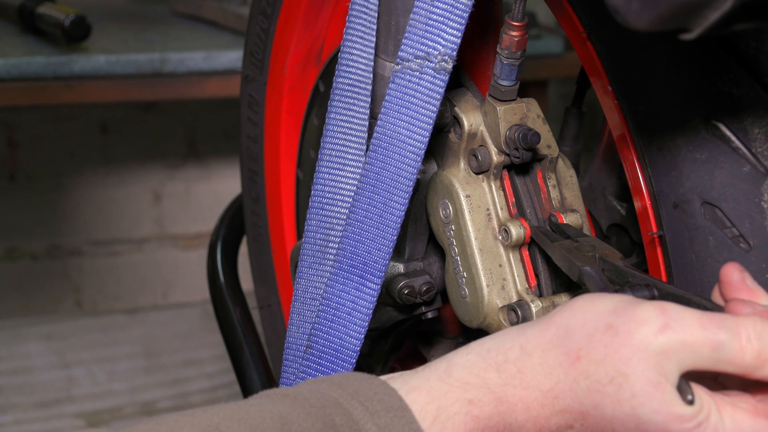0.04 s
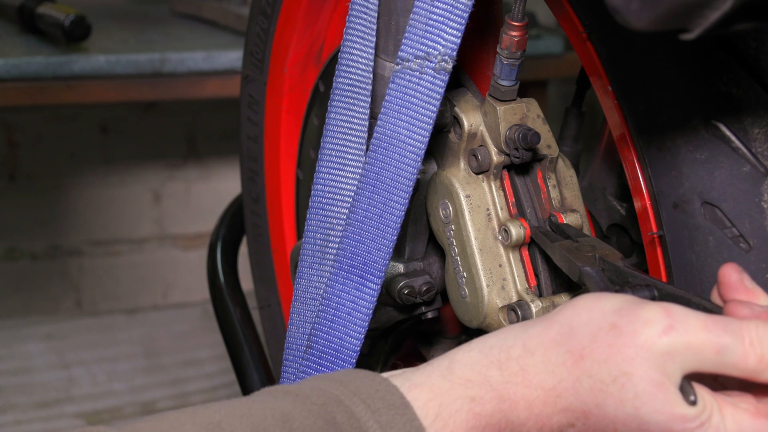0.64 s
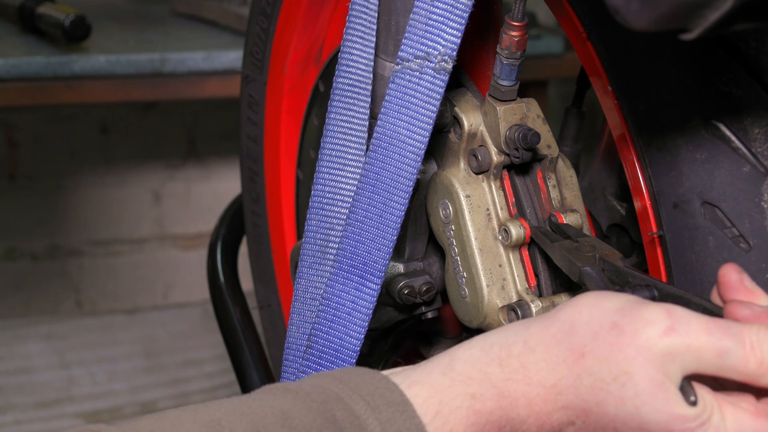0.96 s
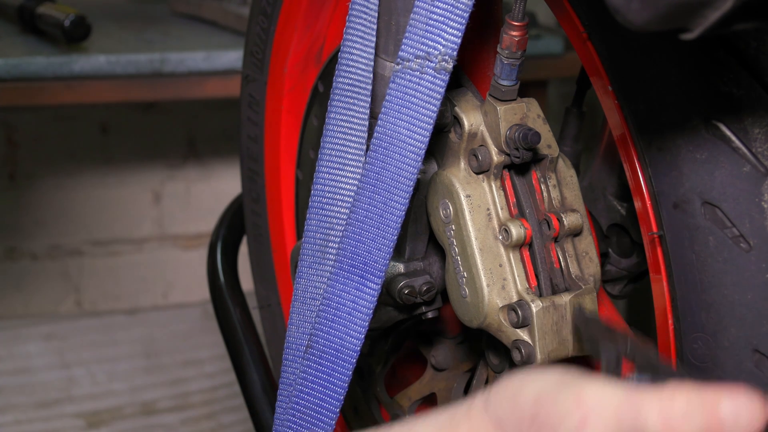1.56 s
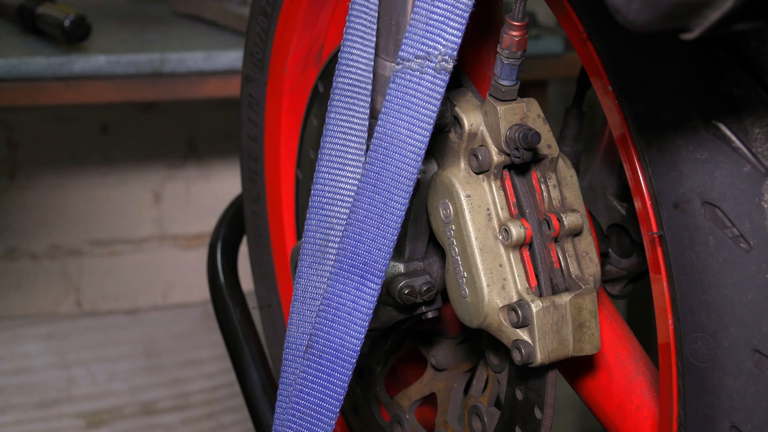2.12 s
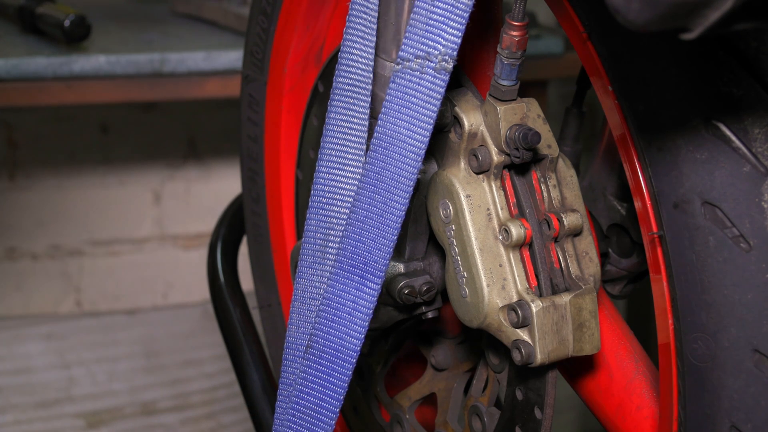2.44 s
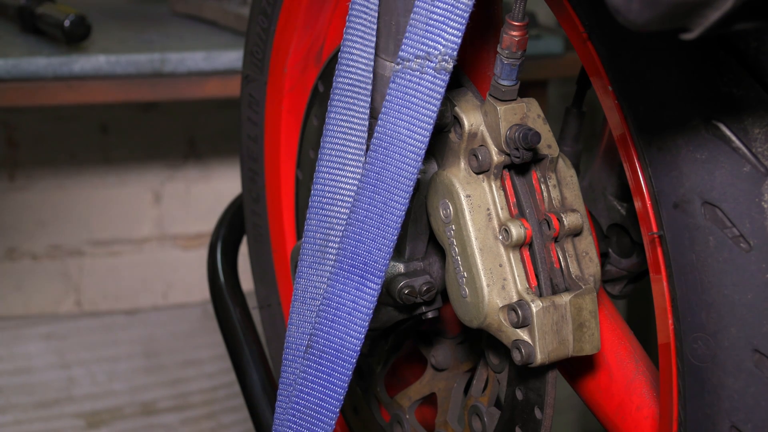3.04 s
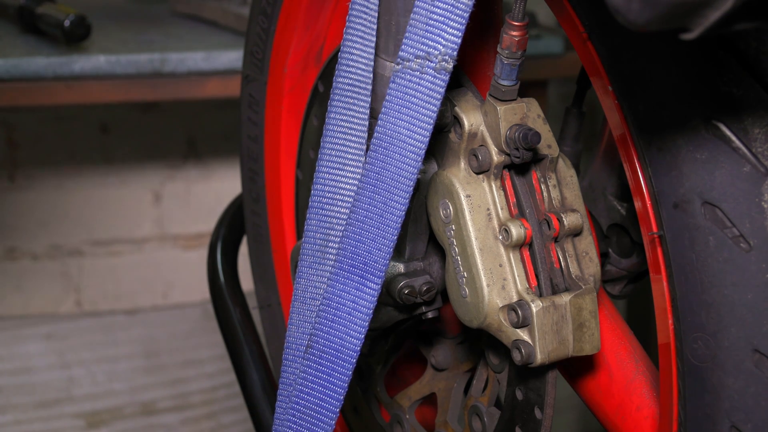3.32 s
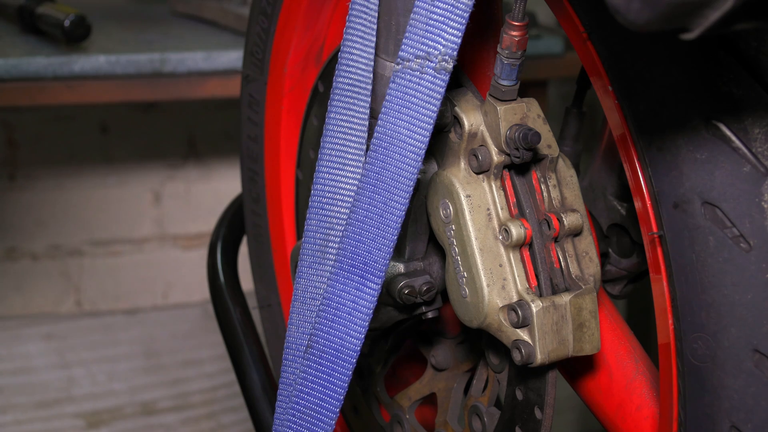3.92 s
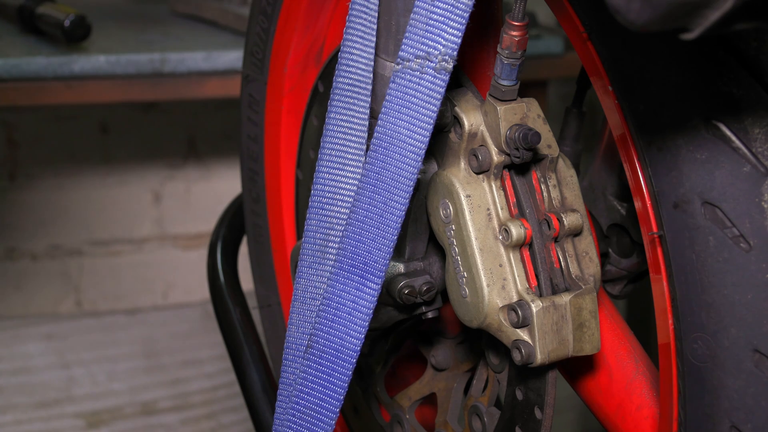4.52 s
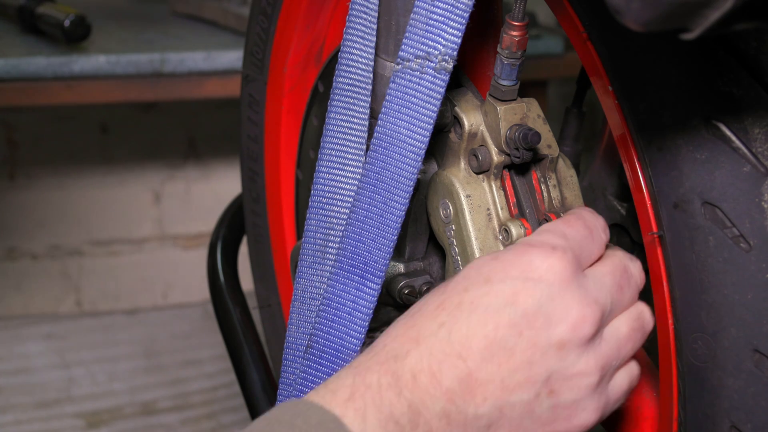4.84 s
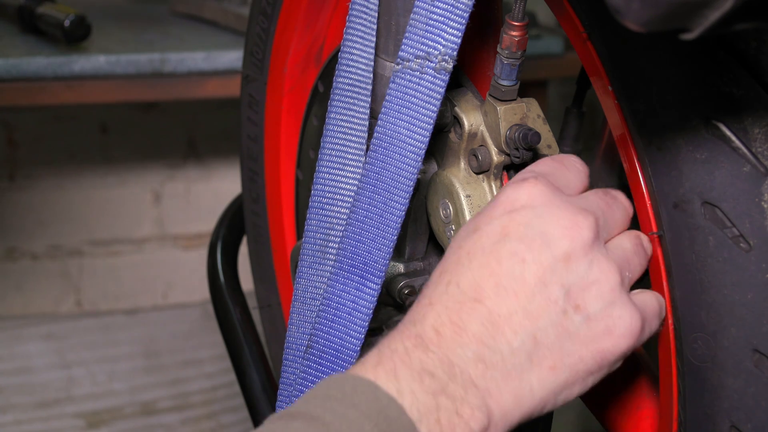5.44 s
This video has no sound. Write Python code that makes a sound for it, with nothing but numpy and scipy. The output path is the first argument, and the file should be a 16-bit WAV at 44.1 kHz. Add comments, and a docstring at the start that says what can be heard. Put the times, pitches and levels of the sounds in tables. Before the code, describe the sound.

In a quiet small garage with a faint low hum, pliers slip and grate against a brake caliper close to the microphone, ending in a loud, hard metallic snap. After light ticks and a soft brush of cloth, the tool is put down with a quick run of clanks. Near the end come faint metal clicks and a short gritty slide as the brake pads are shifted.

```python
"""Pliers out of a brake caliper

Steel pliers scrape out from between the pads of a motorcycle brake caliper and knock against it as
they come free. They clatter down on the work platform, then fingers shift the loose pads. Each hit
is a dense noisy ring plus a few clear modes. A sleeve rustles now and then, and the small brick
garage rings briefly over a faint low hum."""
import sys
import numpy as np
from scipy import signal
from scipy.fft import rfft, irfft, next_fast_len
from scipy.io import wavfile

SR = 44100
rng = np.random.default_rng(int(sys.argv[2]) if len(sys.argv) > 2 else 0)


def wrap_up_sound(samples):
    """Save the sound to the file named by the first command line argument, as 16-bit audio."""
    columns = np.atleast_2d(samples).T
    # keep every value between -1 and 1, then stretch to whole-number steps
    tamed = np.clip(columns, -1, 1)
    steps = np.round(tamed * 32767).astype(np.int16)
    wavfile.write(sys.argv[1], SR, steps)


N = 246028
TIME = np.arange(N) / SR
RING_TIME = np.arange(int(.6 * SR)) / SR
THIRDS = 25 * 2 ** (np.arange(29) / 3)   # third-octave band centres in Hz

# The low hum. Each row: time in seconds, pitch in Hz, level in dB.
HUM_PATH = [(0, 105, -72), (1.62, 107, -69), (1.85, 88, -65.5), (2.12, 73.6, -66.5), (2.52, 73.9, -58.5),
            (2.63, 70, -85), (2.76, 64.2, -64.5), (3.25, 65.8, -65), (3.78, 70, -62), (3.95, 75.3, -79),
            (4.3, 102.9, -73)]
# The tone of still air. Each row: frequency in Hz, gain in dB.
AIR_COLOUR = [(15, -29.5), (25, -8), (76, -8.5), (108, -3), (137, -10), (206, -8), (405, -11), (503, -11),
              (2280, -31), (7710, -35), (14800, -34), (16000, -38.5)]

# The jaws slip along the pads. Each row: start in seconds, level in dB, treble in dB, ring in dB,
# contact point from 0 on the tips to 1 on the flanks.
JAW_SLIPS = [(1.311, -64, -15, -6, .5), (1.3228, -65.5, 14, 3.5, 0), (1.341, -64, -4, -3, .5),
             (1.358, -54, -6, -1, 0.93), (1.3686, -57.5, 3, 2, 0.73), (1.3725, -56.5, -1, -14, 0.6),
             (1.3992, -50.5, -7.5, -1.5, 0.92), (1.409, -57, -3, -7, 1), (1.419, -75, 15, -12, .5)]
# The pliers' dense ring. Each row: frequency in Hz, third-octave level in dB, t60 in seconds.
JAW_BODY = [(25, -35, .1), (120, -5, 0.14), (250, -5, 0.14), (700, -4, 0.096), (1080, -6.5, 0.12),
            (2000, 2.5, 0.039), (3820, 7.5, 0.02), (7000, 1.5, 0.028), (12000, 2, 0.028), (16000, -1, .03)]
# Their clear modes. Each row: pitch in Hz, dB on the tips, dB on the flanks, t60 in seconds.
JAW_MODES = [(243, 8, 8.5, .4), (520, 11, -3, .25), (750, 6, -5, 0.25), (2010, -12, -2, 0.24),
             (2372, -9, 1.5, 0.23), (3780, -16, 0, 0.14), (3890, -12, 3, 0.13), (4770, -7, -7, 0.28),
             (5400, -8, -2, 0.15), (8560, 7.5, 5, 0.065), (9520, 2, -9, 0.06), (10300, 6.5, -9, 0.055),
             (12500, -8, -3, 0.09)]
# Serrated steel on grit. Each row: frequency in Hz, band level in dB.
SCRAPE_COLOUR = [(300, -16), (1000, -10), (1600, 5), (2600, -6), (3700, 3), (6000, -6), (15000, -12)]

# The jaws hit the caliper. Each row: start in seconds, then level, bass, treble and ring in dB.
CALIPER_KNOCKS = [(1.4399, -41, 2, 3, -6), (1.4420, -43, -4, -3.5, 5)]
# The caliper's dense ring. Each row: frequency in Hz, third-octave level in dB, t60 in seconds.
CALIPER_BODY = [(25, -32, .1), (60, -24, 0.14), (129, -10, 0.037), (190, -8, .1), (278, -1, 0.26),
                (600, -3, 0.23), (840, 5, 0.15), (1280, -12, 0.084), (2310, -17, 0.013), (2950, -10, .03),
                (3700, -3, 0.051), (4520, -6.5, 0.022), (7700, 7, 0.024), (12700, 0.5, 0.03),
                (16300, -2, .018)]
# Clear tones a knock wakes: low resonances of the garage and high steel rings.
# Each row: pitch in Hz, level in dB, t60 in seconds.
KNOCK_MODES = [(233, 1.5, 0.49), (302, 1.5, 0.48), (362.6, 2.5, 0.3), (430, -10, 0.29), (513, 3.5, 0.35),
               (569, -8, .25), (656, -5, 0.34), (723, -1, 0.24), (742, 17.5, 0.16), (778, 4, 0.21),
               (837, -1.5, 0.32), (868, 7, 0.14), (1080, -17, 0.19), (1292, -11, 0.21), (3451, -11, 0.12),
               (3500, -19, .2), (4107, -19, 0.16), (7970, 0, 0.1), (9440, -12, .13), (11530, 1.5, 0.046),
               (12960, -6, .08)]

# Hard, instant contacts. Each row: start in seconds, level in dB, hardness as a tilt in dB per
# octave, polarity (1 pushes the air, -1 pulls it).
SNAPS = [(1.4402, 1, 0.7, -1), (1.4420, -12, -3.5, 1), (1.8951, -27, -1.5, 1), (1.8954, -52, 10.5, 1),
         (2.0912, -30.5, 4.5, 1), (2.5026, -34, -6, -1)]
# The tone of a snap. Each row: frequency in Hz, gain in dB.
SNAP_COLOUR = [(40, -17), (150, 2.5), (800, 9.5), (1500, 1), (2600, -3.5), (4000, -1), (4900, -14),
               (7000, -13.5), (14000, -11.5), (18000, -36)]

# Sleeve moves. Each row: start in seconds, length in seconds, level in dB, body against treble in dB.
SLEEVE_STROKES = [(2.008, 0.15, -74, 9.5), (2.126, 0.045, -72.5, 8), (2.304, .07, -71.5, -15),
                  (2.394, 0.052, -62.5, -27), (2.457, 0.043, -67, -20), (2.508, 0.11, -69, -2.5)]
# The hiss of cloth. Each row: frequency in Hz, band level in dB.
SLEEVE_COLOUR = [(300, -14), (1200, -8), (2200, -2), (4500, -3.5), (8000, 1), (14000, 5), (17000, -11)]

# The pliers land. Each row: start in seconds, then level, bass, treble and ring in dB, contact from
# 0 on the nose to 1 flat, first rocking gap in seconds, loss per rock in dB.
LANDINGS = [(3.4245, -44.5, 0.5, -0.5, 2, 0.014, 0.0055, 5), (3.4560, -48, 2.5, -15, -6.5, .3, 0.0064, 5.5),
            (3.4986, -43, 2, -17, -4.5, .3, 0.0071, 7.5), (3.5134, -42, -0.5, -17, -6, 0.38, .006, 7),
            (3.6297, -30, -7.5, -2, -6, 0.88, .0055, 7.5), (3.63663, -39, 4.5, -10, 4.5, 1, 0.0048, 15),
            (3.6543, -47, 5, -13, 0, 0.93, .008, 16)]
# The platform's dense ring. Each row: frequency in Hz, third-octave level in dB, t60 in seconds.
PLATFORM_BODY = [(25, -48.5, .1), (60, -33, 0.13), (170, -20.5, 0.14), (252, -14.5, 0.089),
                 (388, 0, 0.0966), (704, 3.5, 0.13), (1100, 0.5, 0.14), (1706, -0.5, 0.14),
                 (2804, 5, 0.052), (4535, 0, 0.087), (6700, -7.5, 0.17), (9500, -9, 0.073),
                 (13200, -8.5, .05), (16050, -25, 0.042)]
# A landing's clear modes. Each row: pitch in Hz, dB on the nose, dB when flat, t60 in seconds.
PLATFORM_MODES = [(267, -10, -23.5, 0.2), (364.4, -0.5, -4.5, 0.22), (403, -2.5, -1, .12),
                  (487, -10, 7, 0.13), (514, -4.5, -7.5, 0.73), (531, -9.5, 6.5, 0.26),
                  (592, -6.5, -7.5, .27), (657.4, 11, -12, 0.22), (714, -10.5, 0.5, 0.3),
                  (742, -4, 3.5, 0.33), (777, 6, -5.5, 0.26), (896.5, 2, -8.5, 0.28), (957, -4, -6, 0.33),
                  (983, 2, -8, 0.33), (1092, -12, -15.5, .24), (1177, -1.5, -17.5, 0.17),
                  (1245, 0.5, -13, 0.22), (1267, -11.5, -7, .13), (1490, -14, -6.5, .2),
                  (1570, -17.5, -6, .17), (1773, -13.5, -3.5, 0.22), (2210, -11, -16, 0.27),
                  (2595, -3.5, -8, 0.23), (2822, -13, 4, .055), (2888, -10, 13, 0.08),
                  (2953, -22.5, -19, 0.4), (2912, -16, 3.5, .07), (3224, 11.5, -19, 0.077),
                  (4148, -19, -9, 0.15), (4450, -9, -12, .15), (4870, -16, -12, 0.35),
                  (6800, -29, -20, 0.18)]

# Fingers tap the pads. Each row: start in seconds, then level, treble and ring in dB, length as a
# share of the free ring.
PAD_TAPS = [(5.0006, -53.5, -11.5, 5, 1), (5.0085, -59, -20, -5, 1), (5.0859, -55, -15, 1.5, 0.28),
            (5.1074, -55, -11, 7, 0.32), (5.124, -61, -11, -9, 0.28), (5.130, -60, -12, 3, 0.69),
            (5.1373, -66, 8, -4, 0.4), (5.2822, -61, 23, -12, 0.68)]
# A pad drops onto its seat. Each row: start in seconds, level in dB.
PAD_DROPS = [(5.007, -62.5), (5.284, -62)]
# A pad's dense ring. Each row: frequency in Hz, third-octave level in dB, t60 in seconds.
PAD_BODY = [(25, -36, 0.072), (119, -17, 0.083), (302, -5, 0.11), (750, 5.5, 0.084), (1490, -2.5, 0.083),
            (2500, -2, 0.096), (3700, -1.5, 0.051), (6000, -1, 0.037), (11000, -3, 0.06), (16000, -9, .03)]
# Its clear modes. Each row: pitch in Hz, level in dB, t60 in seconds.
PAD_MODES = [(733, 1, 0.11), (990, -11.5, 0.07), (1288, 4, 0.057), (1690, -9, .12), (1970, -14, .09),
             (3440, 11, 0.026), (3850, 4, 0.063), (5670, 8.5, 0.019), (8490, -16, .08)]
# A pad grating on its pin. Each row: frequency in Hz, band level in dB.
SLIDE_COLOUR = [(200, -1.5), (450, 6.5), (1000, -5), (1350, 1), (1600, 4.5), (1950, 1.5), (2500, -11),
                (3050, 0.5), (3380, 4.5), (3650, -8), (4000, 3.5), (4500, -9), (6300, -5), (8000, -8),
                (12000, -6), (17000, -11)]

# The garage's tail. Each row: frequency in Hz, level against the send in dB, t60 in seconds.
GARAGE_REVERB = [(80, -10, .45), (250, -8, .38), (550, -7.5, .36), (1200, -7, .33), (3000, -8, .36),
                 (6000, -8, .34), (10000, -10, .27), (16000, -15, .18)]


def from_db(db):
    """Decibels to gain."""
    return 10 ** (np.asarray(db) / 20)


def rms_one(x):
    """Scale each row to rms 1."""
    return x / np.sqrt(np.mean(x ** 2, axis=-1, keepdims=True) + 1e-20)


def at_hz(rows, hz):
    """Read each column of a spectrum at the given frequencies."""
    row_hz, *columns = np.transpose(rows)
    return [np.interp(np.log(np.maximum(hz, 1)), np.log(row_hz), column) for column in columns]


def add(out, start_s, sound):
    """Mix a sound in at its cue."""
    start = int(round(start_s * SR))
    out[..., start:start + sound.shape[-1]] += sound[..., :N - start]


def steady_noise(colour, per_octave=False):
    """Coloured noise at rms 1; per_octave reads the colour as band levels, so flat means pink."""
    size = next_fast_len(N)
    hz = np.fft.rfftfreq(size, 1 / SR)
    gain = from_db(at_hz(colour, hz)[0]) * (hz > 15)
    if per_octave:
        gain = gain / np.sqrt(np.maximum(hz, colour[0][0]))
    return rms_one(irfft(rfft(rng.standard_normal(size)) * gain, size)[:N])


def grain(depth_db, per_s):
    """A random flutter around 1: slow for a waver, fast for the catching of a rubbed surface."""
    knots = rng.standard_normal(8000)
    return rms_one(from_db(depth_db * np.interp(TIME * per_s, np.arange(len(knots)), knots)))


def arch(start_s, length_s):
    """A half-sine swell and fade."""
    return np.sin(np.pi * np.clip((TIME - start_s) / length_s, 0, 1))


def decays(t60, size):
    """Envelopes that fall by 60 dB in t60 seconds, one per row."""
    return np.exp(-np.log(1000) / t60[:, None] * RING_TIME[:size])


def dense_ring(t60, size):
    """Countless close modes: a dying noise per third octave, each starting near level 1."""
    hz, edge = np.fft.rfftfreq(size, 1 / SR), 2 ** (1 / 6)
    in_band = (hz > THIRDS[:, None] / edge) & (hz < THIRDS[:, None] * edge)
    bands = rms_one(irfft(rfft(rng.standard_normal(size)) * in_band, size))
    envelope = decays(t60, size)
    return rms_one(bands * envelope) * np.sqrt(np.mean(envelope ** 2, axis=1, keepdims=True))


def blend_modes(modes, share):
    """Mode levels for a hit that lands between two spots on an object."""
    return [(hz, here_db + share * (there_db - here_db), t60) for hz, here_db, there_db, t60 in modes]


def hit(body, modes, bass_db, treble_db, ring_db, length=1, contact_s=0.000058):
    """One hit in two layers, clatter and tones: heavy adds bass, hard adds treble, a grip cuts length."""
    def force_db(hz, bass_hz=1000, treble_hz=5500):
        """The contact force as a low and a high shelf."""
        return bass_db / (1 + (hz / bass_hz) ** 2) + treble_db / (1 + (treble_hz / hz) ** 2)
    body_db, body_t60 = at_hz(body, THIRDS)
    clatter = from_db(body_db + force_db(THIRDS)) @ dense_ring(body_t60 * length, size=8192)
    hz, mode_db, t60 = np.transpose(modes)
    signs = (-1) ** np.arange(len(hz))   # neighbouring modes push the air in opposite senses
    strengths = signs * from_db(mode_db + ring_db + force_db(hz))
    sines = np.sin(2 * np.pi * hz[:, None] * RING_TIME)
    tones = strengths @ (sines * decays(t60 * length, len(RING_TIME)))
    clatter = np.pad(clatter, (0, len(tones) - len(clatter)))
    attack = 1 - np.exp(-RING_TIME / contact_s)
    return np.array([clatter, tones]) * attack


def hits(cues, body, modes):
    """A run of hits on one object, as clatter and tones."""
    out = np.zeros((2, N))
    for start_s, level_db, *touch in cues:
        add(out, start_s, from_db(level_db) * hit(body, modes, *touch))
    return out


def room_tone(air_db=-62):
    """A bed of still air and a low hum that wavers in pitch and level."""
    times, pitches, levels = np.transpose(HUM_PATH)
    hz = np.interp(TIME, times, pitches) * grain(depth_db=0.93, per_s=32)
    hum = from_db(np.interp(TIME, times, levels)) * np.sqrt(2) * np.sin(2 * np.pi * np.cumsum(hz) / SR)
    return from_db(air_db) * steady_noise(AIR_COLOUR) + hum * grain(depth_db=2.5, per_s=11)


def jaw_slips(bass_db=-4.5):
    """The jaws catch and slip with little weight behind them; tips ping high, flanks ring lower."""
    out = np.zeros((2, N))
    for start_s, level_db, treble_db, ring_db, flank in JAW_SLIPS:
        ping = hit(JAW_BODY, blend_modes(JAW_MODES, flank), bass_db, treble_db, ring_db)
        add(out, start_s, from_db(level_db) * ping)
    return out


def jaw_drag(start_s=1.312, end_s=1.436, ramp_s=0.0049, level_db=-54, catches_per_s=700):
    """The jaws rub on the pads: tiny uneven catches keep the pressed, damped caliper grumbling."""
    pull = np.clip(np.minimum(TIME - start_s, end_s - TIME) / ramp_s, 0, 1)
    catches = (rng.random(N) < catches_per_s / SR) * rng.standard_normal(N)
    ring = hit(CALIPER_BODY, KNOCK_MODES, bass_db=0, treble_db=-5, ring_db=-2.5, length=0.29).sum(0)
    ring /= np.sqrt(np.sum(ring ** 2))
    return from_db(level_db) * signal.fftconvolve(pull * rms_one(catches), ring)[:N]


def jaw_scrape(start_s=1.369, length_s=0.015, level_db=-49):
    """The serrated jaws grate over the gritty edge of a pad."""
    grit = steady_noise(SCRAPE_COLOUR, per_octave=True) * grain(depth_db=5, per_s=620)
    return from_db(level_db) * arch(start_s, length_s) * grit


def caliper_knocks():
    """The jaws come free with a tight double knock that sets steel and garage ringing."""
    return hits(CALIPER_KNOCKS, CALIPER_BODY, KNOCK_MODES)


def metal_snaps(size=4096):
    """Metal stopping dead on metal sends out a single sharp pressure pulse."""
    out, hz = np.zeros(N), np.fft.rfftfreq(size, 1 / SR)
    for start_s, level_db, hardness, polarity in SNAPS:
        tilt_db = hardness * np.log2((hz + 100) / 2000)
        gain = from_db(level_db + at_hz(SNAP_COLOUR, hz)[0] + tilt_db)
        # minimum phase: nothing sounds before the contact
        cepstrum = irfft(np.log(gain))
        causal = cepstrum[:size // 2] * np.r_[1, np.full(size // 2 - 1, 2)]
        pulse = irfft(np.exp(rfft(causal, size)))
        add(out, start_s, polarity * pulse)
    return out


def sleeve_rustle(split_hz=5000, roundness=0.48):
    """Cloth brushes in short strokes that swell and fade, some full-bodied, some all treble."""
    rub = steady_noise(SLEEVE_COLOUR, per_octave=True) * grain(depth_db=1.0, per_s=270)
    treble = signal.sosfilt(signal.butter(2, split_hz, "high", fs=SR, output="sos"), rub)
    body = signal.sosfilt(signal.butter(2, split_hz, "low", fs=SR, output="sos"), rub)
    out = np.zeros(N)
    for start_s, length_s, level_db, body_db in SLEEVE_STROKES:
        swell = arch(start_s, length_s) ** roundness
        out += from_db(level_db) * swell * (treble - body * from_db(body_db))
    return out


def pliers_landing(contacts=3, slowing=1.5):
    """The pliers touch nose first, then fall flat, rocking to rest each time in softer, slower hits."""
    out = np.zeros((2, N))
    for start_s, level_db, bass_db, treble_db, ring_db, flat, gap_s, loss_db in LANDINGS:
        modes = blend_modes(PLATFORM_MODES, flat)
        landing = bass_db, treble_db, ring_db
        rocking = bass_db + 5.5, treble_db - 8.5, ring_db - 5
        for k in range(contacts):
            clank = hit(PLATFORM_BODY, modes, *(rocking if k else landing), contact_s=0.00025)
            add(out, start_s + gap_s * k ** slowing, from_db(level_db - k * loss_db) * clank)
    return out


def pad_clicks(tap_bass_db=-10):
    """Light fingertips tap the loose pads about, and they drop onto their seats with a dull clack."""
    taps = [(start_s, level_db, tap_bass_db, *touch) for start_s, level_db, *touch in PAD_TAPS]
    dull = 7.5, -17, -11, 1.95   # bass, treble and ring in dB, ring length as a factor
    drops = [(start_s, level_db, *dull) for start_s, level_db in PAD_DROPS]
    return hits(taps + drops, PAD_BODY, PAD_MODES)


def pad_slide(start_s=5.10, attack_s=0.03, hold_s=0.051, level_db=-57.5, fade_db_per_s=56.5):
    """A pad grates along its pin: a quick push, a short hold, a long fade as it slows to rest."""
    since = TIME - start_s
    attack = np.clip(since / attack_s, 0, 1)
    fade_db = fade_db_per_s * np.maximum(since - attack_s - hold_s, 0)
    grit = steady_noise(SLIDE_COLOUR, per_octave=True) * grain(depth_db=3.0, per_s=800)
    return attack * from_db(level_db - fade_db) * grit


def garage(send, predelay_s=.007, build_s=0.011):
    """Wall echoes thicken into a short tail that loses its treble first."""
    wet_db, t60 = at_hz(GARAGE_REVERB, THIRDS)
    build = 1 - np.exp(-RING_TIME / build_s)
    tails = rms_one(dense_ring(t60, len(RING_TIME)) * build)
    band_share = THIRDS * (2 ** (1 / 6) - 2 ** (-1 / 6)) / (SR / 2)
    response = (from_db(wet_db) * np.sqrt(band_share / len(RING_TIME))) @ tails
    return signal.fftconvolve(send, np.r_[np.zeros(int(predelay_s * SR)), response])[:N]


def scene():
    """The mono mix: the caliper is close up; the platform is farther off and wakes more of the room."""
    pliers = jaw_slips() + caliper_knocks()
    pads, landing, snaps = pad_clicks(), pliers_landing(), metal_snaps()
    # reverb sends: the clatter spreads most widely
    clatter, tones = from_db(-1.5) * pliers + from_db(-4) * pads + landing
    reverb = garage(clatter + from_db(-9.5) * tones + from_db(-15) * snaps)
    impacts = (pliers + pads + landing).sum(axis=0) + snaps
    friction = jaw_drag() + jaw_scrape() + pad_slide() + sleeve_rustle()
    return (impacts + friction + reverb + room_tone())[None]


def record(dry):
    """A steep low-pass takes off the very top."""
    cutoff_hz = 16100
    return signal.sosfilt(signal.ellip(10, .1, 70, cutoff_hz, fs=SR, output="sos"), dry)


dry = scene()
out = record(dry)
wrap_up_sound(out)
```